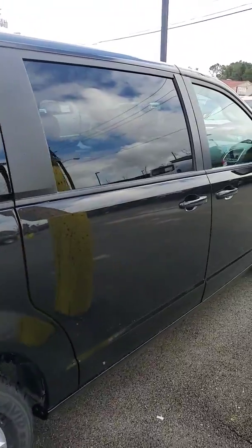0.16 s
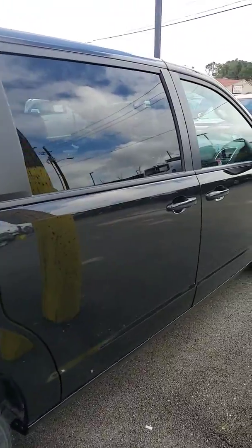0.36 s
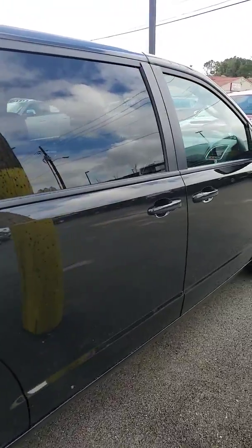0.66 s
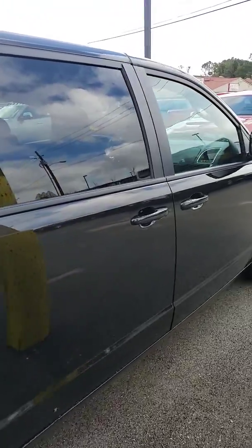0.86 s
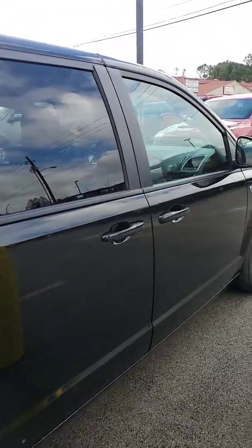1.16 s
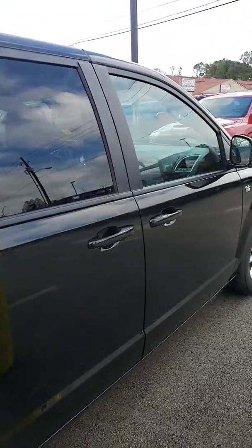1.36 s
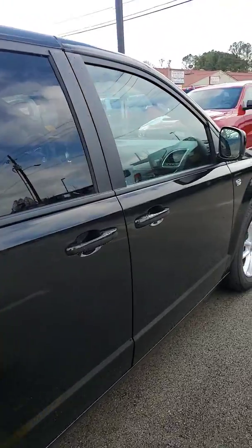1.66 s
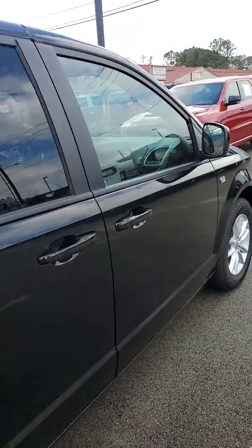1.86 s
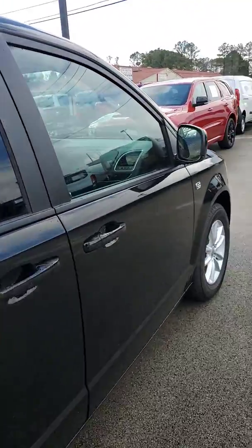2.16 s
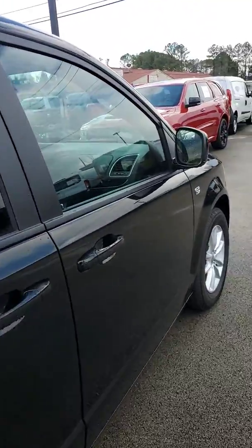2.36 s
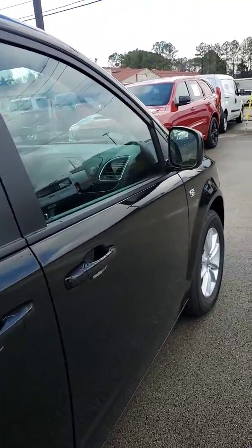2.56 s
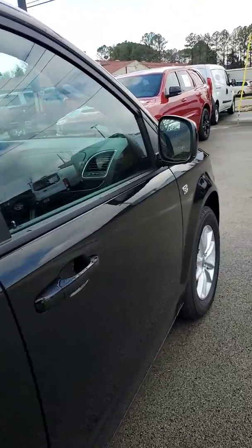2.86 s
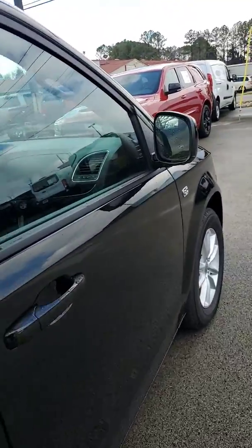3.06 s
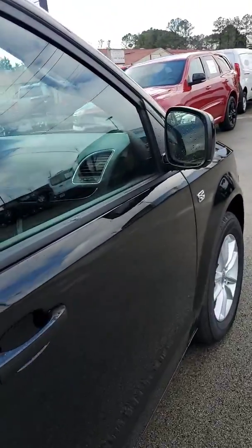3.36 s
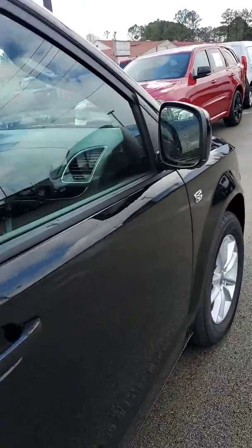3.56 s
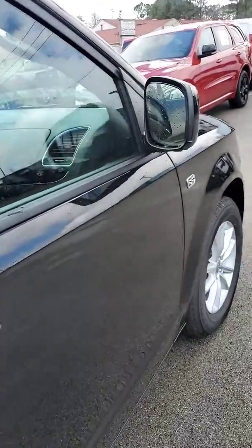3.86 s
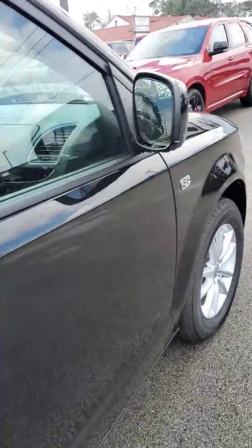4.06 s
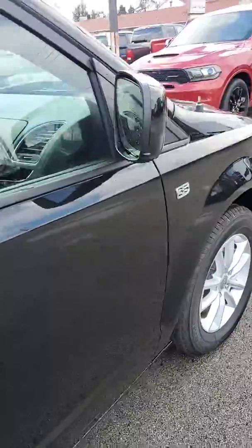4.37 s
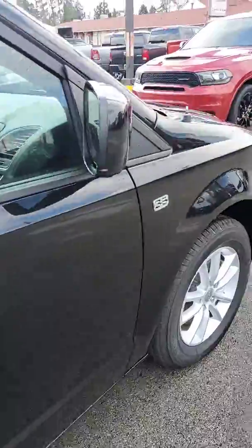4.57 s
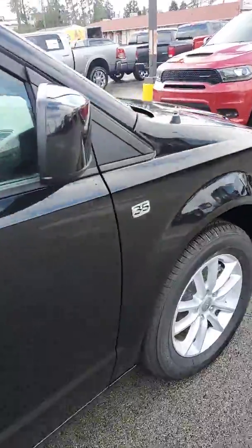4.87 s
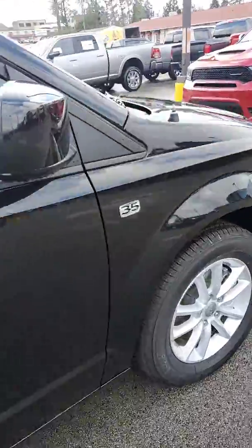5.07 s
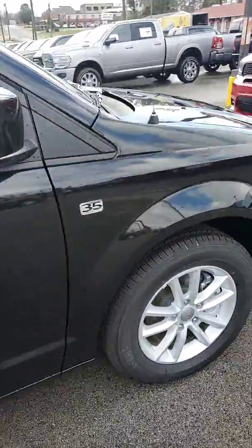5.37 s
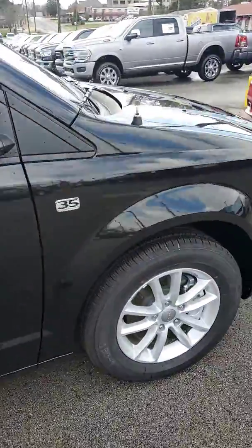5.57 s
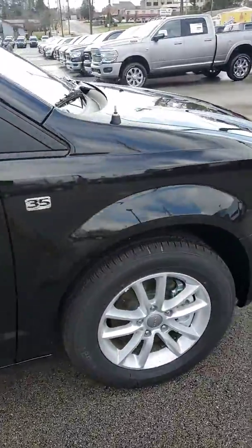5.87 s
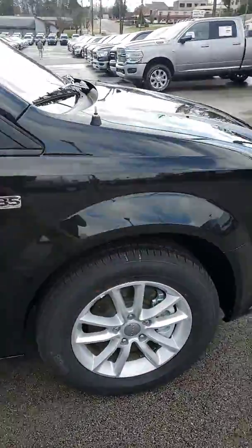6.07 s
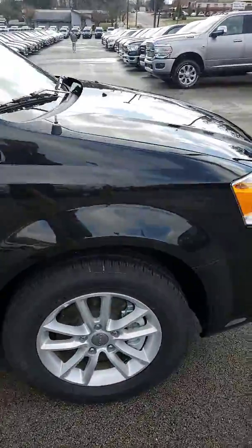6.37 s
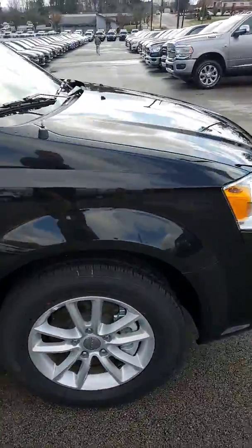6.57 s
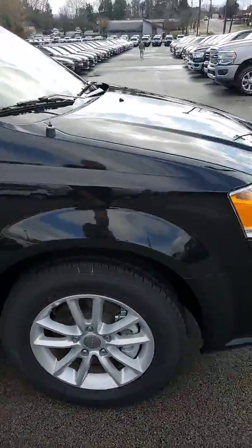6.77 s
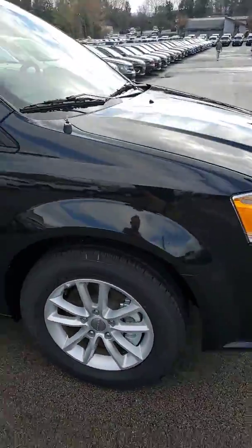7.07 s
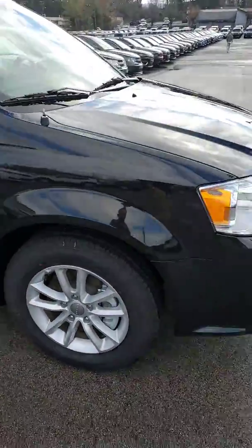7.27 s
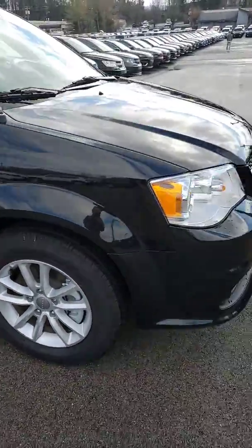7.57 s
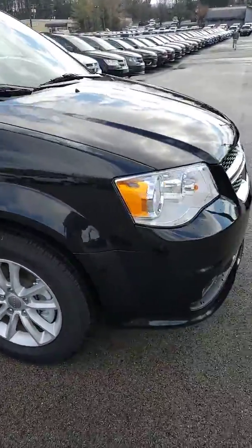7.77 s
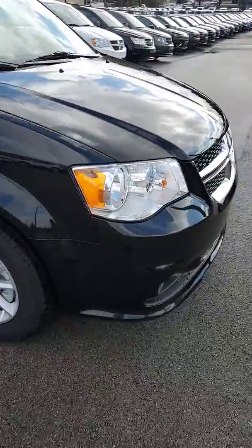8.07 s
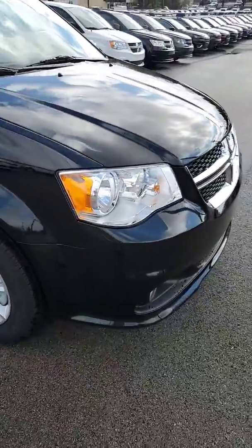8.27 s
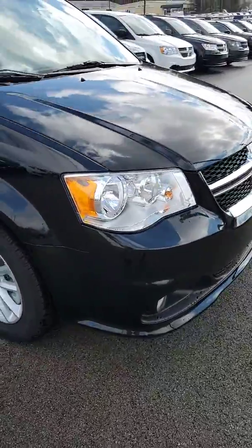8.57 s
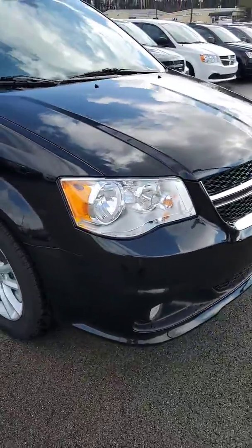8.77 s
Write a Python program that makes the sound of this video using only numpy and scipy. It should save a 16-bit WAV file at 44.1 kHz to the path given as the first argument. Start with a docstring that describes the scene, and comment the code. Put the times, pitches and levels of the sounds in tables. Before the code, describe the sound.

Outdoors on an open lot, a handheld stereo microphone moves along an idling van toward its front. A low, slightly wavering pump hum sits over a soft engine roar and fine, throbbing belt hiss. Wind rumbles and thumps the microphone throughout, hardest around five and seven seconds. Near seven seconds a bright jet of air hisses on the right, opening and shutting quickly.

```python
"""On an open lot a van idles while a handheld two-port microphone walks from its rear door to its bonnet.
A belt-driven pump hums as two wavering sine tones, over weak drones made of noise around a pitch.
The engine bay is shaped noise that roars, whistles, hisses and throbs with the belt.
A breeze of lumpy noise and short bursts buffets the ports, mostly each in its own way.
Once, on the right, a jet of air hisses: bright noise that opens and shuts quickly."""
import sys
import numpy as np
from scipy import signal
from scipy.io import wavfile
from scipy.ndimage import uniform_filter1d

SR = 44100
rng = np.random.default_rng(int(sys.argv[2]) if len(sys.argv) > 2 else 0)


def wav_out(sig):
    """Save sig, one row per channel (or a flat mono array), as 16-bit PCM at SR to the path in sys.argv[1]."""
    wavfile.write(sys.argv[1], SR, np.round(np.clip(np.atleast_2d(sig).T, -1, 1) * 32767).astype(np.int16))


N = 392931


def gain_of(db):
    """Turns decibels into a factor for the sound wave."""
    return 10 ** (np.asarray(db) / 20)


def evened(x):
    """Scales a signal to an average strength (rms) of 1."""
    return x / np.sqrt(np.mean(x ** 2) + 1e-20)


def curves(rows):
    """Joins the rows of a time table with straight lines, giving each column at every sample."""
    s, *columns = np.transpose(rows)
    return [np.interp(np.arange(N) / SR, s, column) for column in columns]


def read(points, hz):
    """Looks up a spectrum table, with pitch on a logarithmic axis as in hearing."""
    f, value = np.transpose(points)
    return np.interp(np.log(hz + 1), np.log(f + 1), value)


def wander(rate_hz):
    """Slow chance movement of rms 1: many sines, none faster than rate_hz."""
    t = np.arange(0, N, 64) / SR
    rates = np.geomspace(rate_hz / 4, rate_hz, num=24)
    slow = sum(np.sin(2 * np.pi * (f * t + rng.random())) for f in rates)
    return np.interp(np.arange(N) / SR, t, evened(slow))


def coloured(points):
    """Makes a spectrum table into an unchanging colour for noise."""
    return lambda hz, s: gain_of(read(points, hz))


def ring(hz, centre_hz, width_hz):
    """Gain of a steep resonance: strongest at its centre, weaker on both sides."""
    return 1 / (1 + (2 * (hz - centre_hz) / width_hz) ** 2)


def panned(db):
    """Gains of the left and right port for a left-minus-right difference."""
    return gain_of(np.array([db / 2, -db / 2]))


def add(mix, s, sound):
    """Mixes a sound in from time s."""
    start = round(s * SR)
    mix[:, start:start + sound.shape[-1]] += sound


# how alike van sound is at the two ports: (frequency [Hz], likeness [0 to 1])
PORT_LIKENESS = [(60, .99), (200, 1), (640, .85), (1500, .6), (4000, .3), (15000, .2)]


def engine_alike(hz):
    """Likeness of the ports: low tones reach both almost alike, high ones differ more."""
    return read(PORT_LIKENESS, hz)


LAG_S = 0.00019  # sound shared by the ports reaches the left one later


def noise(gain, alike, patchy_db):
    """Two ports of noise, rms 1 overall, built from chance spectra with patches that drift over time and pitch.

    gain is a function of Hz and s, alike a function of Hz.
    """
    frames, hz = N // 512 + 5, np.fft.rfftfreq(2048, 1 / SR)
    a, b, c, d, patches = rng.standard_normal((frames, 1025, 5), dtype=np.float32).T
    patches = uniform_filter1d(patches, size=16, axis=0)
    patches = evened(uniform_filter1d(patches, size=8, axis=1))
    same = np.clip(alike(hz), 0, 1)[:, None]
    late = np.exp(-2j * np.pi * hz * LAG_S)[:, None]
    right = a + 1j * b
    left = same * late * right + np.sqrt(1 - same ** 2) * (c + 1j * d)
    colour = gain(hz[:, None], np.arange(frames) * 512 / SR)
    spectra = np.array([left, right]) * colour * gain_of(patchy_db * patches)
    return evened(signal.istft(spectra, nperseg=2048, noverlap=1536)[1][:, :N])


# loudness of the pump's two tones: (time [s], hum level [dB], level of the tone a fifth above [dB])
HUM_LEVELS = [(0, -31, -55), (.6, -27.5, -49.5), (1.3, -30.5, -47.5), (1.85, -29.5, -59), (2.3, -32, -47.5),
              (2.7, -29.5, -38.5), (3.6, -26.5, -48.5), (4.4, -28, -42), (4.7, -29, -41.5),
              (5.1, -29.5, -42.5), (6.8, -27.5, -39), (7.1, -32.5, -43), (7.3, -36.5, -48),
              (7.6, -38.5, -48.5), (8, -37, -55), (8.91, -32.5, -53)]
# pitch of the lower tone: (time [s], pitch [Hz])
HUM_PITCHES = [(0, 185), (.3, 188), (.5, 186.5), (.7, 188.3), (.9, 185.7), (1.4, 186.2), (1.8, 184.9),
               (2.3, 185.9), (2.9, 187.4), (3.2, 185.1), (3.7, 184.8), (4, 187.3), (4.5, 186.8),
               (4.8, 185.3), (5.5, 185.5), (6, 183.3), (6.3, 185.7), (7.2, 183.4), (8.91, 183.9)]


def hum():
    """Second and third multiple of a pump's pulse rate, wavering a little in pitch and level."""
    low_db, high_db = curves(HUM_LEVELS)
    hz = curves(HUM_PITCHES)[0]
    turns = np.cumsum(hz * (1 + .004 * wander(14) + .003 * wander(4))) / SR
    turns = np.array([turns - hz * LAG_S, turns])  # left, right
    low = gain_of(low_db + 1.07 * wander(16) + 0.41 * wander(2.5)) * np.sin(2 * np.pi * turns)
    # 3 pi instead of 2 pi: one and a half times the pitch
    high = gain_of(high_db + 1.6 * wander(8)) * np.sin(3 * np.pi * turns + .5 * wander(5))
    return np.sqrt(2) * (low + high)  # a sine's rms is its peak over the root of 2


STEADY_HZ = 7  # drones much wider than this have almost no steady core


def drone(hz, width_hz, db, s, reach, glide=0):
    """Noise shifted up to its pitch, with a steady core if its band is narrow; it swells and fades around s."""
    first, last = max(round((s - 3 * reach) * SR), 0), min(round((s + 3 * reach) * SR), N)
    t = np.arange(first, last) / SR
    r = np.exp(-np.pi * width_hz / SR)
    raw = rng.standard_normal((len(t), 4)).T
    a, b, c, d = map(evened, signal.lfilter([1], [1, -2 * r, r * r], raw))
    same = np.clip(engine_alike(hz), 0, 1)
    right = a + 1j * b + 2 * np.exp(-(width_hz / STEADY_HZ) ** 2)
    late = np.exp(-2j * np.pi * hz * LAG_S)
    left = same * late * right + np.sqrt(1 - same ** 2) * (c + 1j * d)
    carrier = np.exp(2j * np.pi * (hz * t + glide * (t - s) ** 2 / 2))
    tone = (np.array([left, right]) * carrier).real
    return t[0], evened(tone) * gain_of(db) / (1 + ((t - s) / reach) ** 4)


# weak drones of exhaust, body and fan, each heard over part of the walk:
# (pitch [Hz], width [Hz], level [dB], centre time [s], reach [s])
WEAK_DRONES = [(71.7, 12, -39, 4, 1.2), (97.6, 7, -40, 2, 2.2), (159.5, 4, -42, 1.5, 2),
               (320, 10, -51, 1.05, .5), (339, 6.5, -50, 1.2, 3.2), (328, 30, -46, 2.75, .35),
               (357, 7, -52, 3.2, 1.2), (408, 7, -52, 6.5, .5), (406, 7, -54, 8.5, .5),
               (434, 12, -53, 0.9, 0.9), (435, 8, -56, 3.8, .8), (463, 7, -53, 4.9, .9),
               (645, 75, -49, 1.2, 2.3), (639, 30, -53, 6.6, 0.88), (1100, 1400, -46.5, 1.4, 1.7),
               (1327, 86, -54.5, 6.3, 1.7), (1640, 270, -51, 3.75, 0.63), (1800, 260, -53.5, 7.9, 0.7),
               (1830, 110, -54, 8.1, .17)]
# short husky tones, most of them gliding:
# (pitch [Hz], width [Hz], level [dB], centre time [s], reach [s], glide [Hz per s])
HUSKY_TONES = [(760, 200, -45.5, .93, .09, 500), (720, 200, -44, 1.21, .1, -200),
               (1130, 90, -50, 1.6, .07, -200), (810, 50, -53, 1.87, .07, 0), (965, 15, -56, 2.22, .2, 0),
               (900, 40, -52, 2.67, .05, -500), (700, 80, -51, 2.84, .04, -300),
               (870, 50, -50, 3.68, .04, 400), (900, 70, -51, 4.14, .04, -500),
               (975, 30, -54, 4.28, .1, 150)]


def drones():
    """All drones and husky tones, each a band of noise around its pitch, from narrow to very broad."""
    out = np.zeros((2, N))
    for row in WEAK_DRONES + HUSKY_TONES:
        add(out, *drone(*row))
    return out


# loudness of the engine: (time [s], roar level [dB], engine bay hiss level [dB])
ENGINE_LEVELS = [(0, -38.5, -44.5), (1.1, -38.5, -44), (1.5, -37.5, -41.5), (2, -37.5, -43),
                 (3.2, -37, -44), (3.8, -37.5, -45.5), (4.15, -36, -42), (5.2, -35.5, -39.5),
                 (6, -35.5, -41.5), (6.4, -36, -42.5), (6.8, -33.5, -41), (7.25, -38, -43.5),
                 (7.6, -40.5, -47), (8.1, -39.5, -46), (8.91, -36, -43.5)]
# colour of the roar: (frequency [Hz], relative level [dB per Hz])
ROAR_COLOUR = [(30, -20), (70, -7), (130, -14.5), (240, -14.5), (400, -21.5), (550, -26.5), (1000, -27),
               (2000, -30), (3100, -29), (4200, -36), (6000, -37), (7600, -39.5), (8700, -42),
               (11000, -52.5), (16000, -60)]
# colour of the engine bay hiss: (frequency [Hz], relative level [dB per Hz])
HISS_COLOUR = [(7000, -19), (9500, -3), (11200, -3), (12300, 3.5), (13000, 3.5), (14000, 0), (15000, 2.5),
               (16000, -6)]
# pitch of the belt whine: (time [s], pitch [Hz])
WHINE_PITCH = [(0, 1014), (.37, 1022), (.69, 1027), (1, 1012), (1.33, 1022), (1.97, 996), (2.3, 1010),
               (2.6, 1018), (2.9, 1035), (3.2, 1005), (3.57, 1006), (3.9, 1016), (4.5, 1014), (4.85, 1005),
               (5.3, 1003), (5.5, 1030), (5.8, 982), (6.1, 1007), (6.8, 1001), (7.15, 995), (7.6, 1010),
               (7.9, 996), (8.91, 1003)]
# fuzzy multiples of the whine: (multiple [times], width [Hz], level over the roar [dB], throb depth [dB])
BELT_WHISTLES = [(5, 170, -27, 1), (7, 300, -19, 1.5), (8.1, 170, -25, -1.5), (9, 190, -24, -0.5),
                 (10, 250, -17.5, 3.5), (12.3, 200, -27, -2), (12.9, 220, -20, 0)]
BELT_HZ, BELT_TURNS = 3.16, 0.19  # loops a second, start of the first loop in turns
CRANK_PER_BELT = 4  # crank turns a belt loop
HISS_PAN_DB, ROAR_PAN_DB = -4.5, -1  # left minus right


def engine():
    """Broad roar, whistles that throb once a belt loop, and bright bay hiss; all flutter once a crank turn."""
    roar_db, hiss_db = curves(ENGINE_LEVELS)
    t = np.arange(N) / SR
    loop = 2 * np.pi * (BELT_HZ * t - BELT_TURNS)
    crank = np.cos(CRANK_PER_BELT * loop + .6 * wander(1.5))

    roar = noise(coloured(ROAR_COLOUR), engine_alike, patchy_db=2.0)
    roar = roar * gain_of(.5 * crank + .5 * wander(30))

    # the belt slips a little on every loop
    slipping_hz = curves(WHINE_PITCH)[0] * (1 - .004 * np.sin(loop) + .006 * wander(12))
    for multiple, width, db, throb_db in BELT_WHISTLES:
        def whistle_colour(f, s):
            return ring(f, multiple * np.interp(s, t, slipping_hz), width)
        whistle = noise(whistle_colour, engine_alike, patchy_db=1.2)
        throb = throb_db * (np.cos(loop) + .5 * wander(9))
        roar = roar + whistle * gain_of(db + throb + .73 * crank)

    hiss = noise(coloured(HISS_COLOUR), engine_alike, patchy_db=1.8)
    hiss = hiss * gain_of(0.72 * crank + 1.1 * wander(30))
    roar = roar * gain_of(roar_db) * panned(ROAR_PAN_DB)[:, None]
    return roar + hiss * gain_of(hiss_db) * panned(HISS_PAN_DB)[:, None]


# gusts: (peak time [s], half length [s], low rumble level [dB],
#         flutter level at the left port [dB], flutter level at the right port [dB])
GUST_ROWS = [(1.147, 0.17, -28, -40, -43), (2.103, 0.19, -29, -51, -53), (2.75, 0.23, -41, -45, -53),
             (3.193, 0.087, -38, -36, -41), (4.1, 0.22, -35, -56, -56), (4.548, 0.078, -44, -36, -40),
             (4.85, 0.29, -29.5, -33.5, -35.5), (5.33, 0.078, -25, -26, -28),
             (5.848, 0.12, -39, -35, -31.5), (6.348, 0.14, -47, -33, -35), (6.78, 0.055, -30, -30, -37),
             (6.98, 0.17, -22, -33, -28.5), (7.17, 0.11, -25.5, -26, -33), (6.959, 0.01, -32, -21, -23),
             (7.085, 0.013, -37, -30, -20.5), (7.134, 0.016, -30, -18, -35), (7.22, 0.0069, -35, -22, -34),
             (7.188, 0.017, -30, -17, -35), (7.592, 0.12, -30.5, -46, -32.5),
             (8.603, 0.64, -30.5, -41, -34)]
BREEZE_DB, FLUTTER_DB = -34, -40.5  # steady low rumble and steady brighter flutter between the gusts


def blowing():
    """Levels in dB of rumble, left flutter and right flutter: breeze plus bell-shaped gusts, added as powers."""
    t = np.arange(0, N, 64) / SR
    power = gain_of([[BREEZE_DB], [FLUTTER_DB], [FLUTTER_DB]]) ** 2
    for s, half, *db in GUST_ROWS:
        power = power + gain_of(db)[:, None] ** 2 * np.exp(-((t - s) / half) ** 2)
    return [np.interp(np.arange(N) / SR, t, 10 * np.log10(p)) for p in power]


# colour of the low rumble: (frequency [Hz], relative level [dB per Hz])
RUMBLE_COLOUR = [(15, -32), (30, -0.5), (48, 2), (90, -2.5), (130, -14), (250, -29), (600, -42),
                 (1500, -100)]
# colour of the brighter flutter: (frequency [Hz], relative level [dB per Hz])
FLUTTER_COLOUR = [(15, -32), (30, -24), (60, -20), (120, -0.5), (250, -6), (500, -18.5), (900, -38),
                  (1800, -100)]


def wind():
    """Lumpy turbulence: low rumble partly shared by the ports, and brighter flutter made apart at each."""
    rumble_db, *flutter_db = blowing()
    rumble = noise(coloured(RUMBLE_COLOUR), lambda f: .2 + 0 * f, patchy_db=.5)
    flutter = noise(coloured(FLUTTER_COLOUR), lambda f: 0 * f, patchy_db=-1.0)
    # light air comes in separate puffs, strong wind runs together
    broken = np.clip((-19.5 - rumble_db) / 9, .2, 1)
    own_puffs = np.array([wander(24), wander(24)])
    lumps = gain_of(broken * (2.8 * wander(15) + 2.3 * own_puffs))
    return (gain_of(rumble_db) * rumble + gain_of(flutter_db) * flutter) * evened(lumps)


def wavelet(hz, half_s, turn):
    """A bell-shaped burst of a cosine in the middle of a tenth of a second."""
    t = np.arange(-.05, .05, 1 / SR)
    return np.exp(-(t / half_s) ** 2) * np.cos(2 * np.pi * (hz * t + turn))


# the strongest single buffets: (middle time [s], peak level [dB], left minus right [dB], pitch [Hz])
BUFFET_ROWS = [(0.494, -18, 2, 70), (0.828, -16, -1, 78), (1.18, -16, -2, 72), (1.28, -21, -5, 76),
               (1.525, -22, -3, 90), (1.783, -16.5, -1, 61.4), (2.062, -16, 1, 83), (2.271, -15, 0, 77.6),
               (2.366, -19, -2, 70), (2.869, -16.5, -1, 66.7), (3.411, -17, -2, 77), (3.609, -20, -2, 75),
               (3.989, -20, -2, 72), (4.028, -20, -1, 71), (4.107, -17, -4, 87), (4.328, -15, 2, 66),
               (4.458, -20, 1, 87), (4.646, -21, -4, 74), (4.705, -26, 3, 91), (4.795, -25, -9, 73),
               (4.827, -12, 0, 82), (4.88, -5.5, 2.5, 110), (5.261, -14, -2, 96), (5.307, -6, 3, 104),
               (5.405, -11, 2, 66), (5.516, -15, 11, 90), (5.634, -23, 8, 92), (5.829, -23, -7, 75),
               (5.905, -19, 3, 89), (6.456, -22, 2, 61), (6.798, -15, 26, 81), (6.842, -21, 13, 70),
               (6.891, -11, -11, 77), (6.924, -10.5, 11, 140), (6.974, -7.5, 10, 55), (7.004, -12, -11, 67),
               (7.048, -12, -16, 76), (7.098, -11.5, -12, 88), (7.133, -9, 10, 151), (7.145, -17, 4, 84),
               (7.179, -9, 15, 78), (7.238, -13, 0, 65), (7.388, -30, -14, 64.6), (7.483, -17.5, 1, 70),
               (7.686, -10.5, -5, 88), (8.065, -23, 12, 75.5), (8.423, -14, -1, 75), (8.548, -19.5, 0, 88)]
BUFFET_TURNS = 0.46  # half length of a buffet in turns of its pitch
TICK_S, TICK_DB, TICK_HZ, TICK_HALF_S = 1.286, -35, 1780, 0.0016  # one small tick


def buffets():
    """Each eddy pushes the membranes in and out about once; a small tick is heard among them."""
    out = np.zeros((2, N))
    chances = rng.random((len(BUFFET_ROWS), 2))
    for (s, db, pan_db, hz), (turn, skew) in zip(BUFFET_ROWS, chances):
        port_turns = turn + np.array([[0], [.45 * (skew - .5)]])
        push = wavelet(hz, BUFFET_TURNS / hz, port_turns)
        port_gains = gain_of(db) * evened(panned(pan_db))[:, None]
        add(out, s - .05, port_gains * push)  # the middle of the burst is .05 s after its start
    add(out, TICK_S - .05, gain_of(TICK_DB) * wavelet(TICK_HZ, TICK_HALF_S, 0))
    return out


# colour of the air jet: (frequency [Hz], relative level [dB per Hz])
AIR_COLOUR = [(500, -42), (1200, -25), (1800, -6.5), (2300, -15), (3000, -10.5), (5000, -26), (7200, -16),
              (9000, -17), (11300, -10), (12500, 1.5), (13800, -6.5), (15000, -9), (16000, -14)]
JET_START_S, JET_STOP_S, JET_EDGE_S = 6.712, 7.244, .012
JET_DB, JET_FADE_DB_PER_S = -27, 10  # level at the start, then how fast it sinks


def jet():
    """Half a second of sharp hiss that opens and shuts quickly; the left port is shaded from it."""
    t = np.arange(N) / SR
    valve = np.clip(np.minimum(t - JET_START_S, JET_STOP_S - t) / JET_EDGE_S, 0, 1)
    air = noise(coloured(AIR_COLOUR), engine_alike, patchy_db=.7)
    level_db = JET_DB - JET_FADE_DB_PER_S * (t - JET_START_S) + 0.95 * wander(40)
    return air * valve * gain_of(level_db) * gain_of([[-22], [0]])  # left, right


def scene():
    """All sources added up at the two ports."""
    return hum() + drones() + engine() + wind() + buffets() + jet()


# moments when the bass drops out of one port: (start time [s], end time [s], depth [dB], port [0 left, 1 right])
BASS_DIPS = [(4.846, 4.926, 12, 0), (4.848, 4.933, 8, 1), (5.516, 5.562, 27, 0), (5.51, 5.557, 5, 1),
             (5.787, 5.884, 8, 0), (6.06, 6.095, 32, 0), (7.278, 7.372, 21, 0), (7.42, 7.431, 9, 0),
             (7.51, 8.85, 4, 1), (7.517, 7.66, 25, 1), (7.693, 8.022, 17, 1), (8.251, 8.387, 14, 1),
             (8.648, 8.808, 16, 1)]
DIP_HZ, LOW_CUT_HZ, EDGE_HZ = 273, 33.5, 15490  # top of the dropping bass, low cut, upper band limit
OVERLOAD = .6  # the strongest buffets are rounded off towards this height


def record(dry):
    """The bass of one port drops out now and then; then the low cut, a soft overload and the band limit."""
    t, loss_db = np.arange(N) / SR, np.zeros((2, N))
    for start, end, depth_db, port in BASS_DIPS:
        inside = np.clip(np.minimum(t - start, end - t) / 0.0056 + .5, 0, 1)
        loss_db[round(port)] += depth_db * inside
    bass = signal.sosfiltfilt(signal.butter(6, DIP_HZ, fs=SR, output="sos"), dry)
    thinned = dry - bass * (1 - gain_of(-loss_db))
    thinned = signal.sosfilt(signal.butter(4, LOW_CUT_HZ, "high", fs=SR, output="sos"), thinned)
    rounded = OVERLOAD * np.tanh(thinned / OVERLOAD)
    band_limit = signal.firwin(1023, EDGE_HZ, window=("kaiser", 9), fs=SR)
    return signal.oaconvolve(rounded, band_limit[None], "same")


dry = scene()
out = record(dry)
wav_out(out)
```